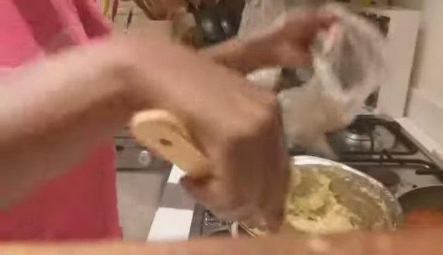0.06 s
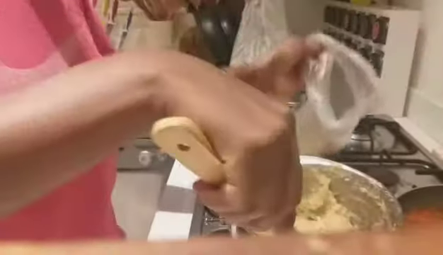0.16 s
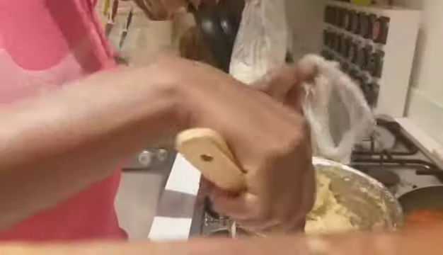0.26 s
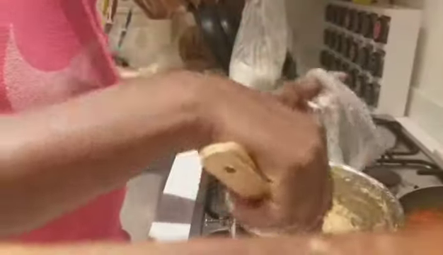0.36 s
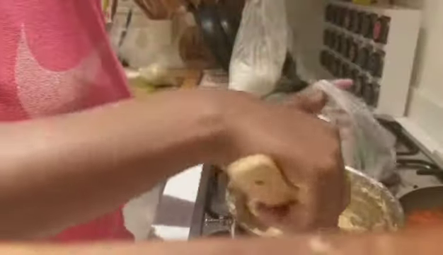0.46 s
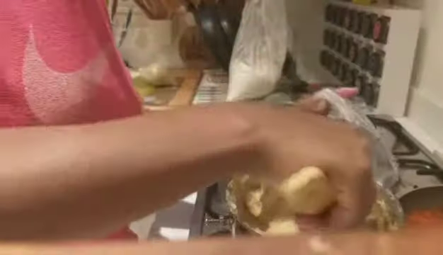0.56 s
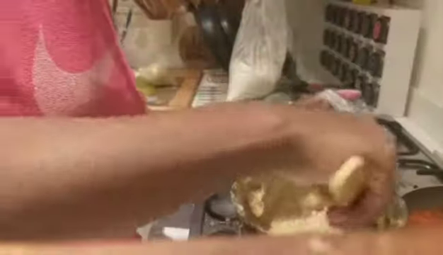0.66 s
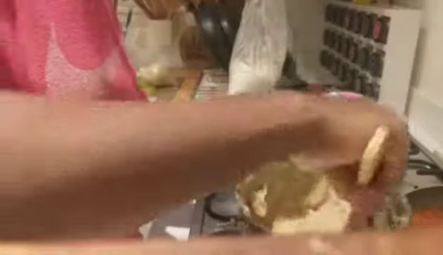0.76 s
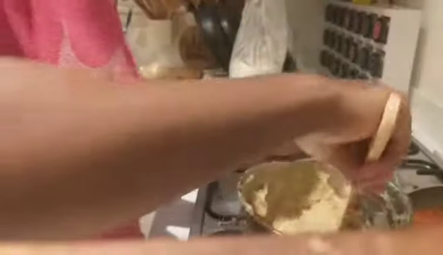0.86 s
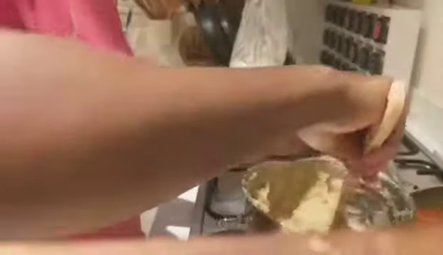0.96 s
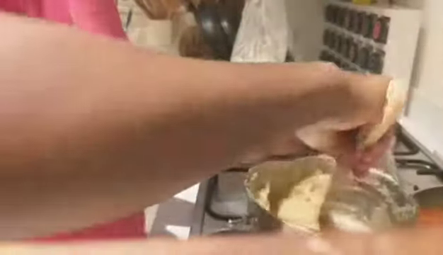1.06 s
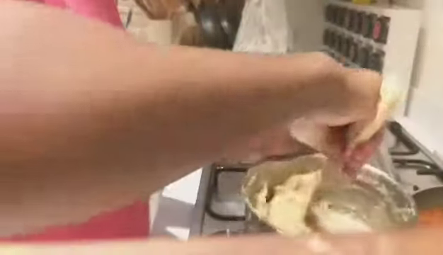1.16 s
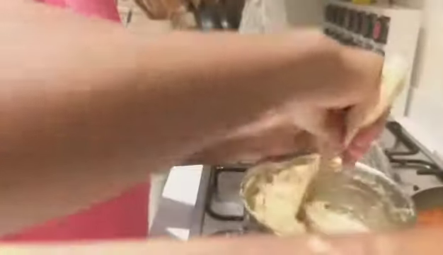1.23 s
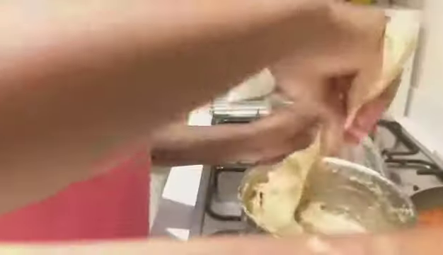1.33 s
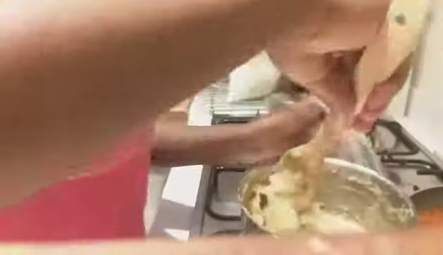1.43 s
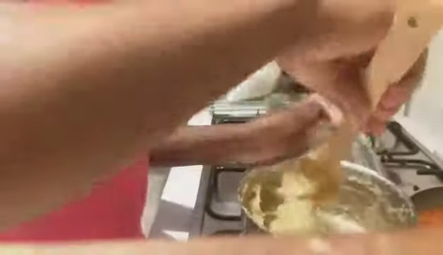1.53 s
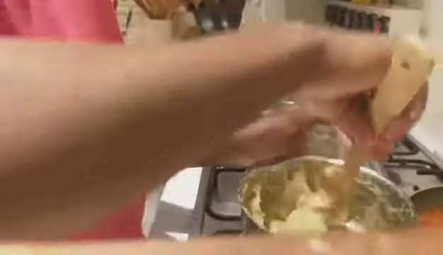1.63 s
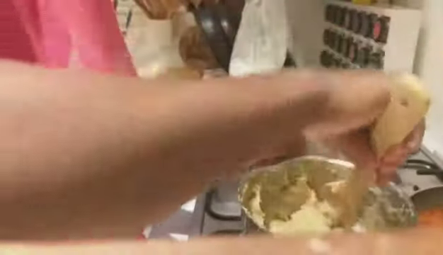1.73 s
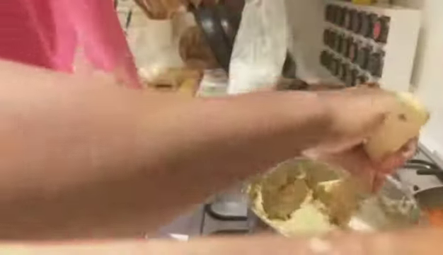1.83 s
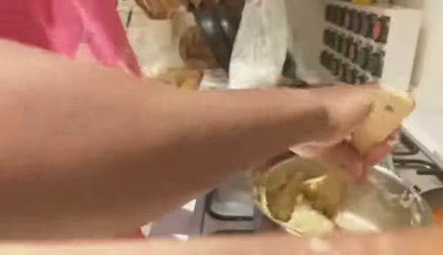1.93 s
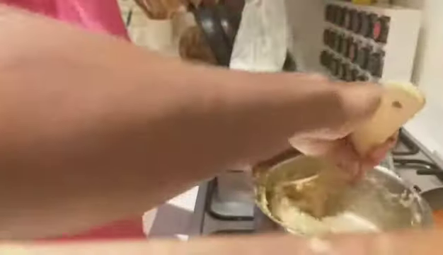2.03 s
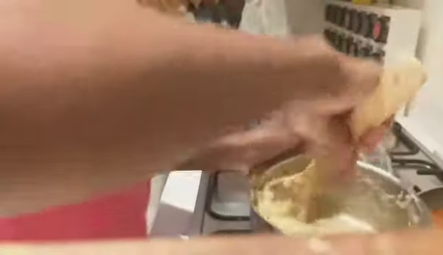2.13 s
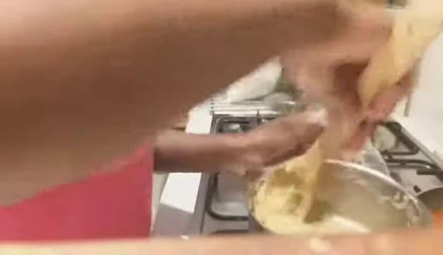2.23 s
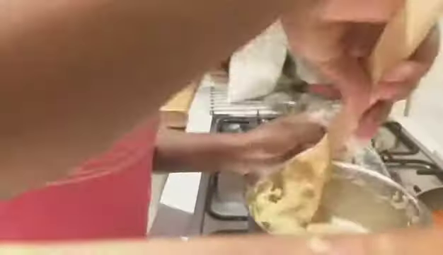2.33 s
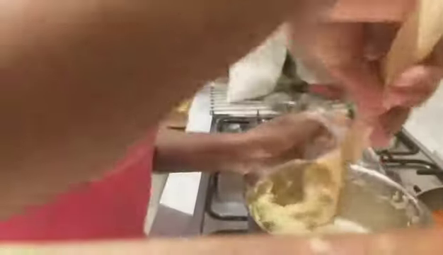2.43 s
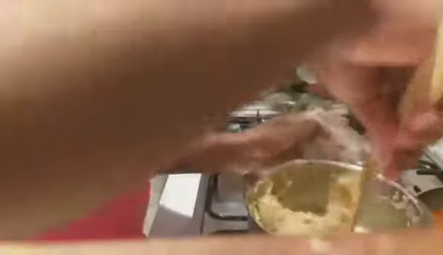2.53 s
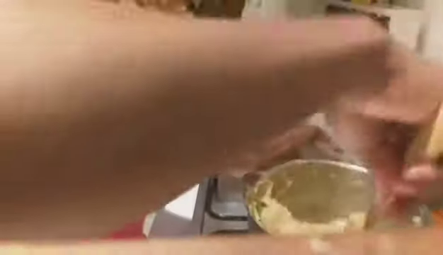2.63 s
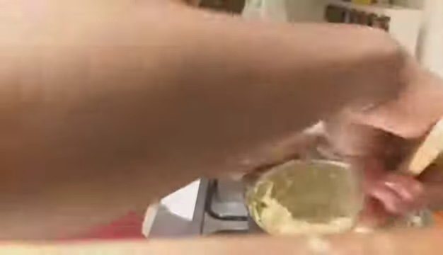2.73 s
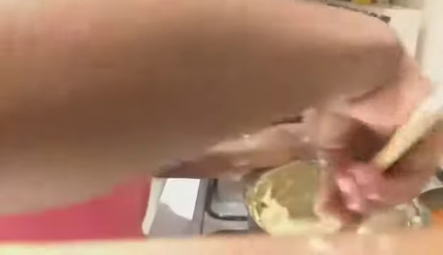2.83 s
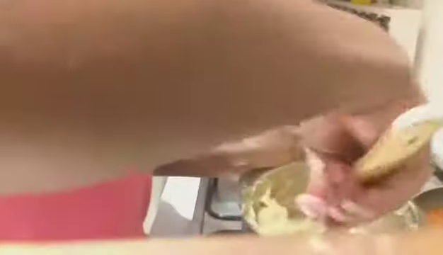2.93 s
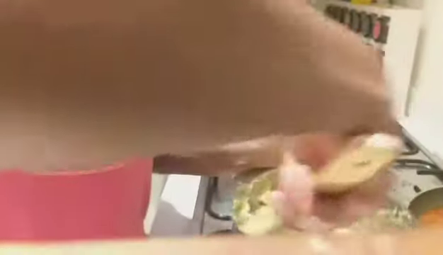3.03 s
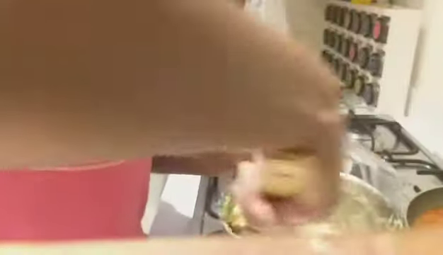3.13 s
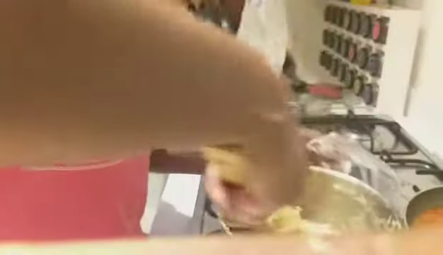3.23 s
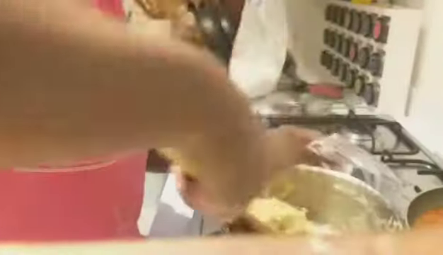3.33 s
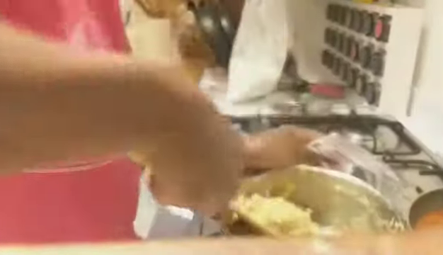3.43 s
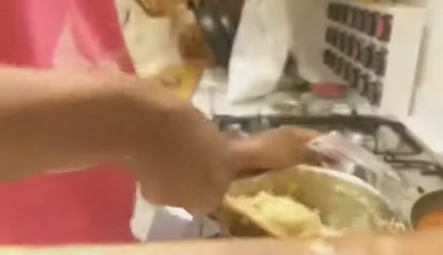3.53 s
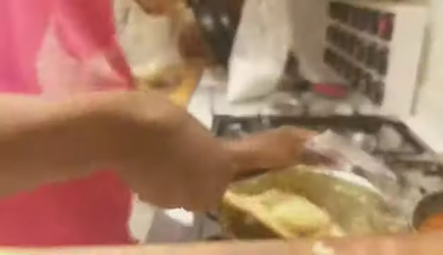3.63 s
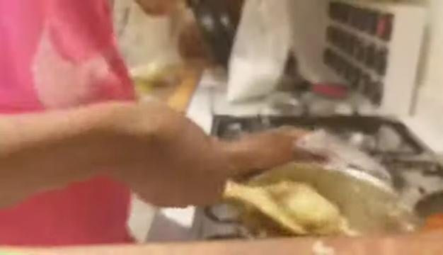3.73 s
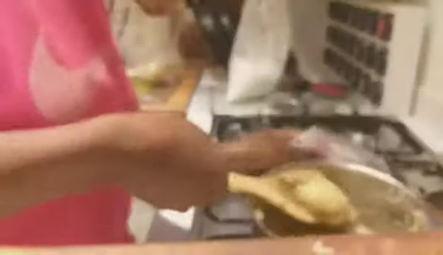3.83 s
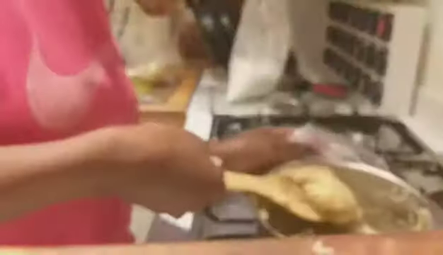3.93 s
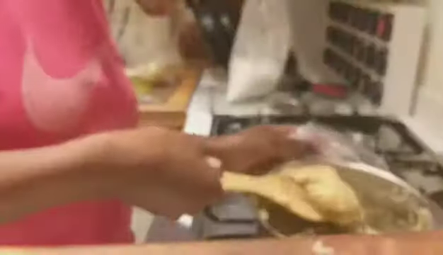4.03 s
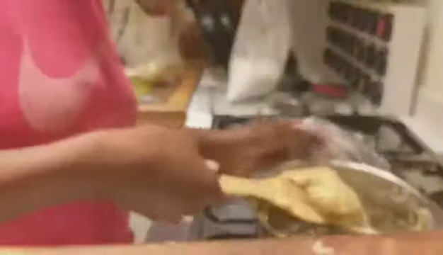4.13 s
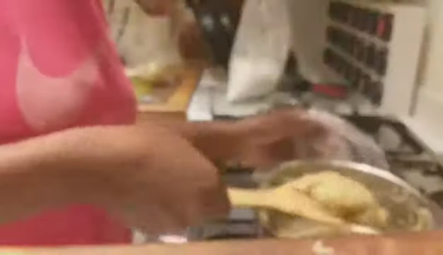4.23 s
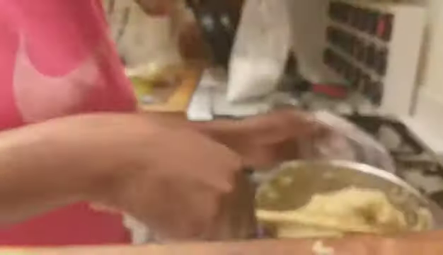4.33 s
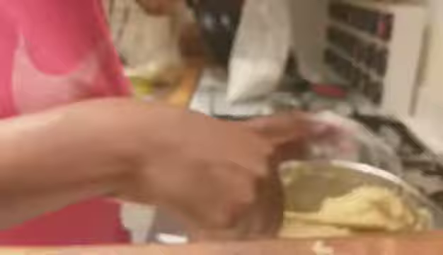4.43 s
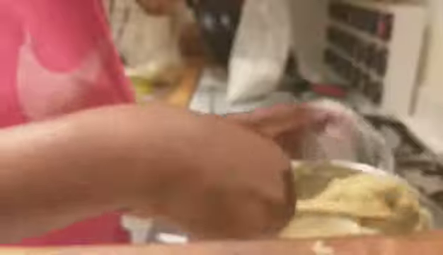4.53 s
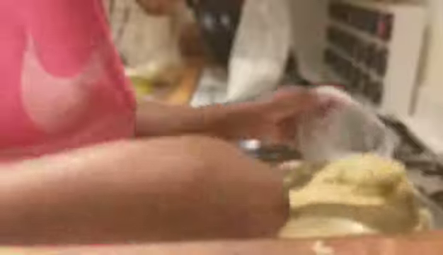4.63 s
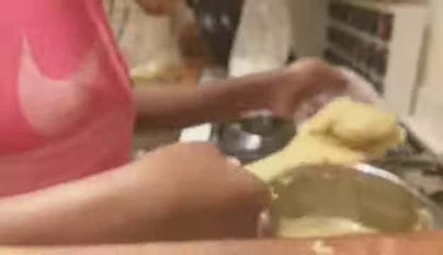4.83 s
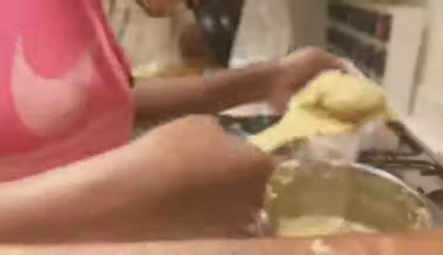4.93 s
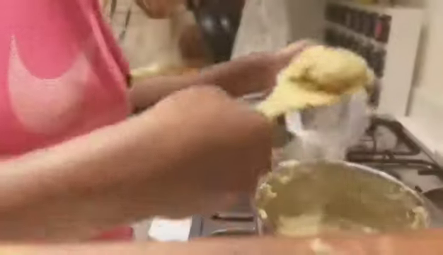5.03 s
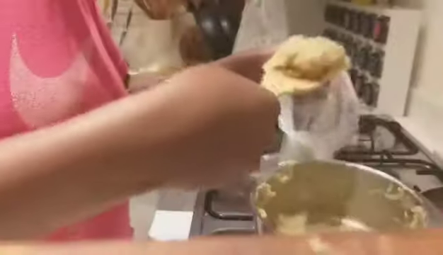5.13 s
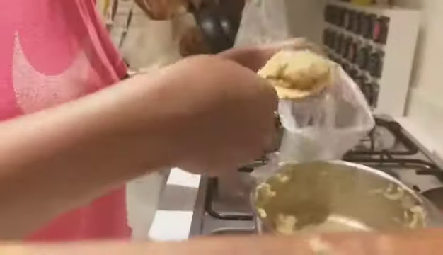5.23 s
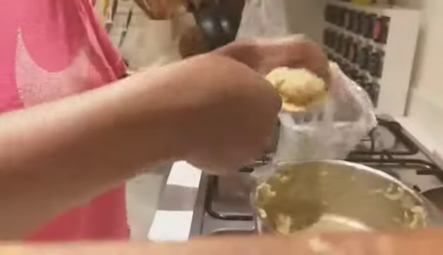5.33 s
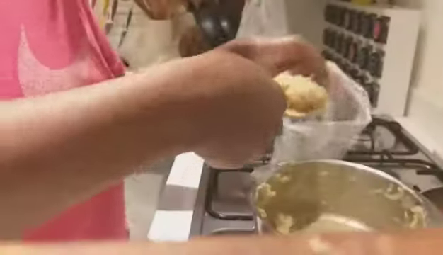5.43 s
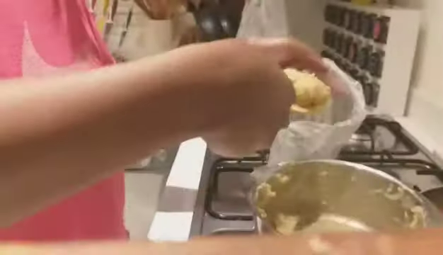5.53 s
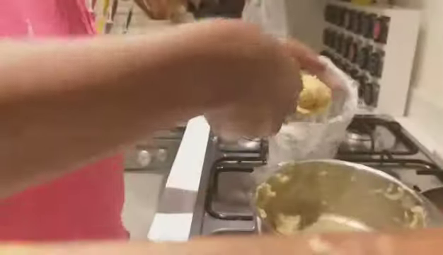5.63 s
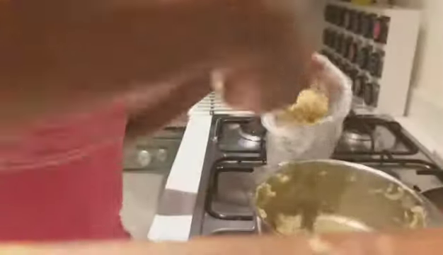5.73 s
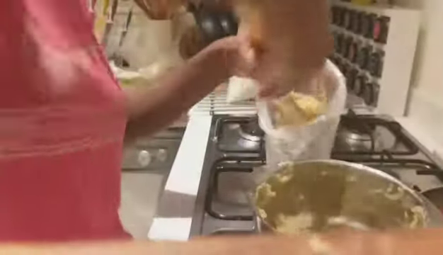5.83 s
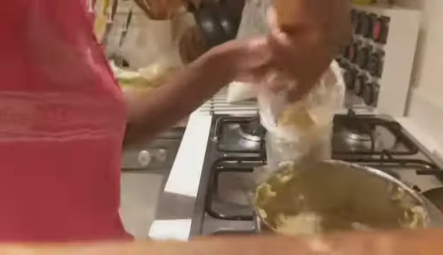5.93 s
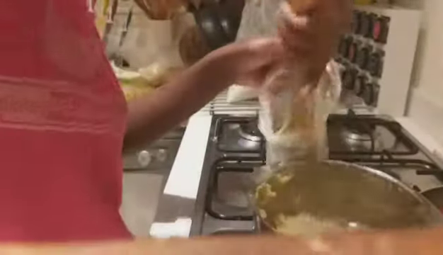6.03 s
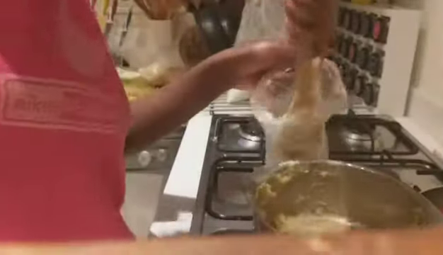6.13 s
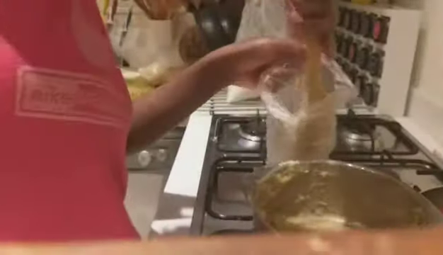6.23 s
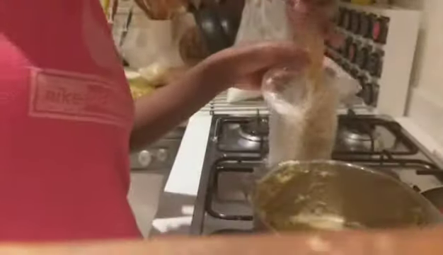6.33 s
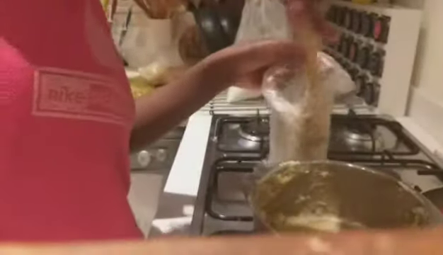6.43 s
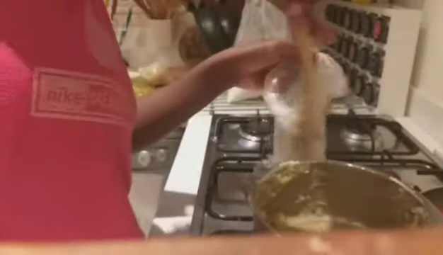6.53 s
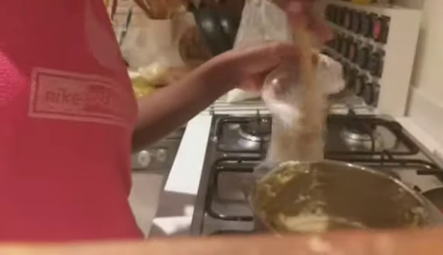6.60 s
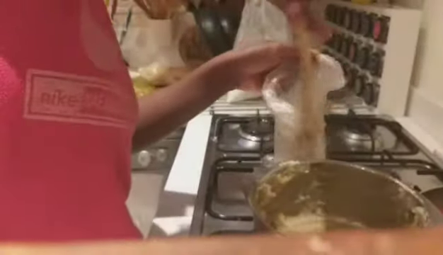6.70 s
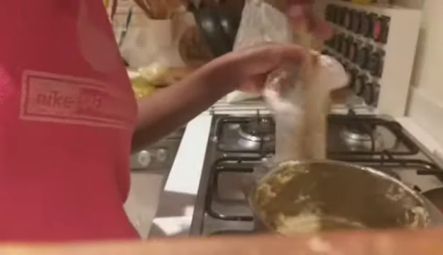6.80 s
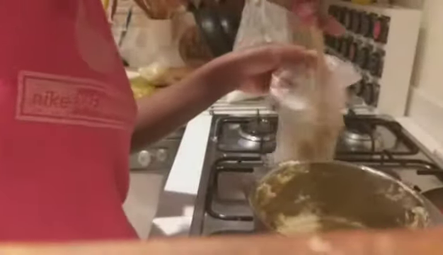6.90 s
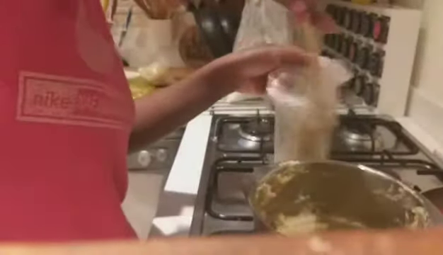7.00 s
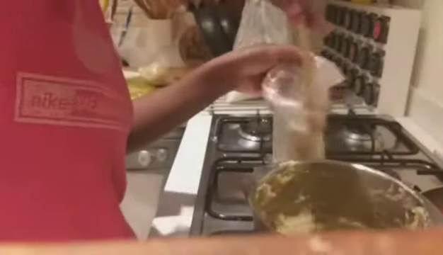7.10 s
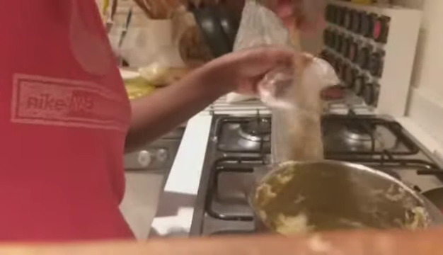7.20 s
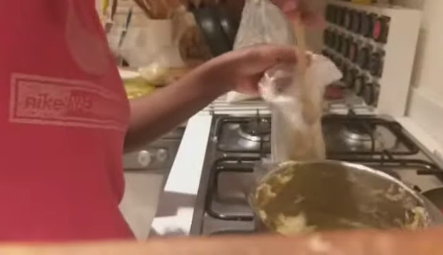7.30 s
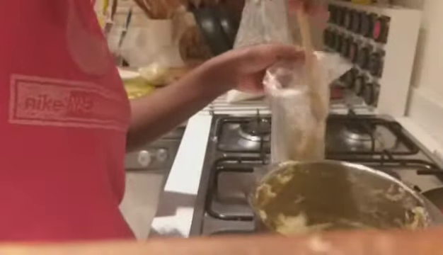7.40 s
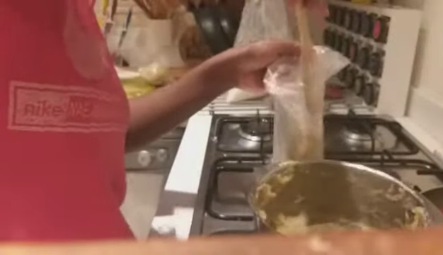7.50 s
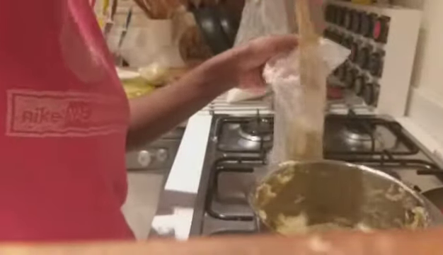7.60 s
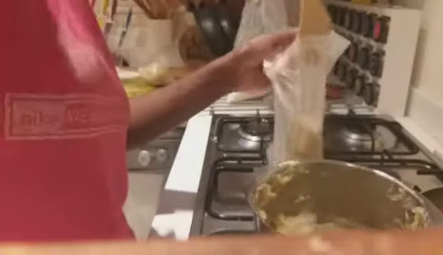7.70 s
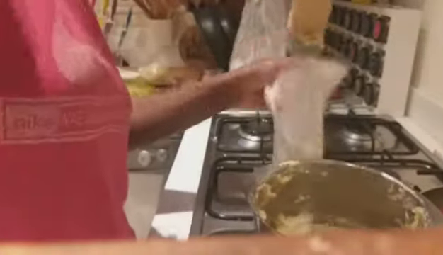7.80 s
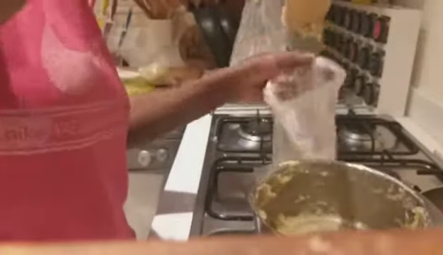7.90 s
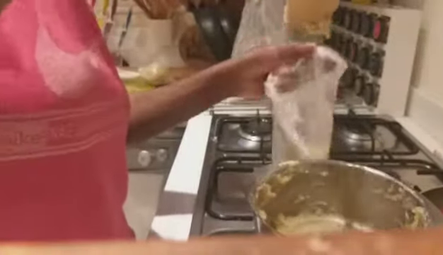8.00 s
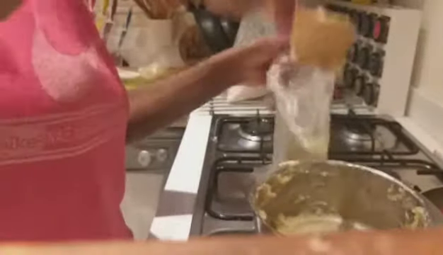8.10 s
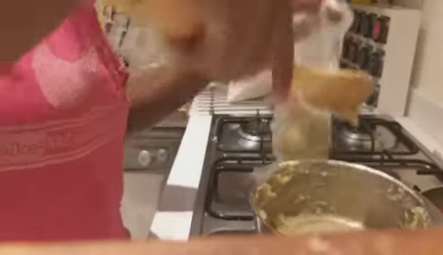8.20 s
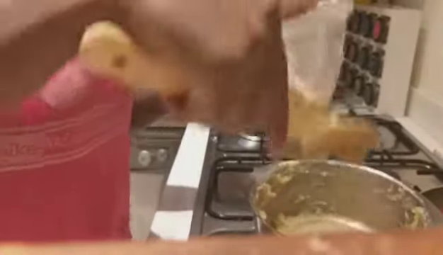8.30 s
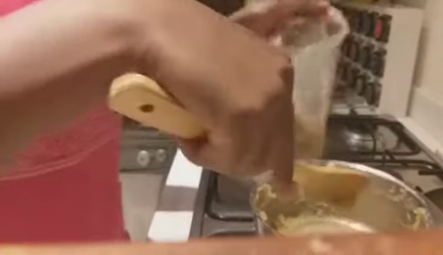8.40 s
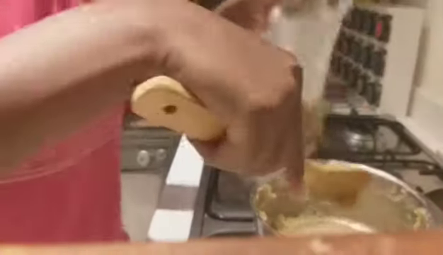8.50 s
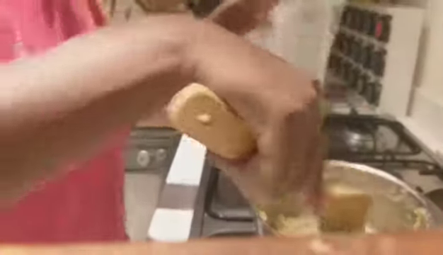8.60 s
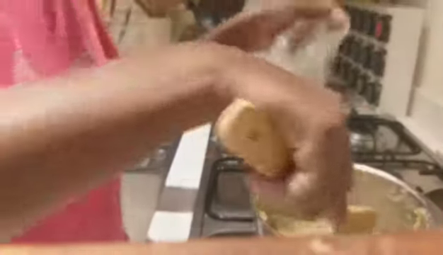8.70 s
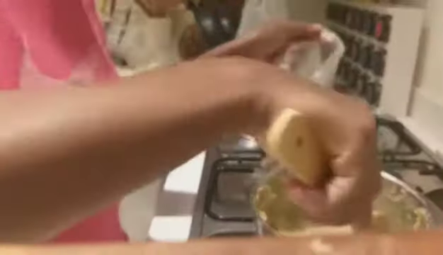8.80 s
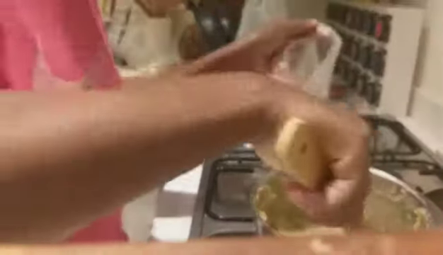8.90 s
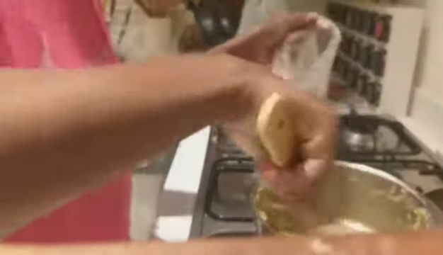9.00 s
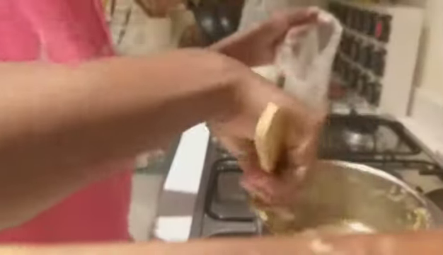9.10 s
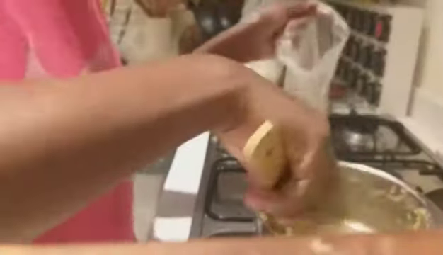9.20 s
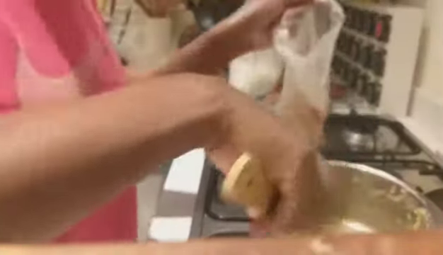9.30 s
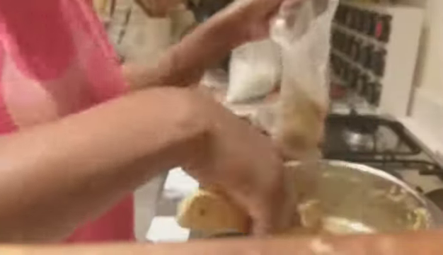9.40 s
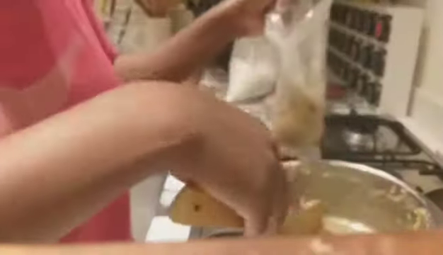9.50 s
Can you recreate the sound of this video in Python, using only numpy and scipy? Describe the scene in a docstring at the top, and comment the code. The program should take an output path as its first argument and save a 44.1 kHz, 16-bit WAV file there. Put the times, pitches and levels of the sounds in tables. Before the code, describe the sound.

A wooden spoon knocks, scrapes and squeals against a steel pot, then a thin plastic bag rustles as soft dough slaps inside.

```python
"""A small kitchen, microphone at arm's length from a steel pot of soft dough on a gas hob.
First a thin plastic bag rustles in one hand. A wooden spoon scoops and knocks the pot, which rings
and rocks on its grate. Around three seconds in, the spoon rubs along the wall and squeals twice.
Then the bag rustles most, as the spoon is wiped off inside it and dough slaps the film.
A last few knocks on the pot close the scene."""
import sys
import numpy as np
from scipy import signal
from scipy.fft import rfft, irfft
from scipy.io import wavfile

SR = 44100
rng = np.random.default_rng(int(sys.argv[2]) if len(sys.argv) > 2 else 0)


def generate_wav(sig):
    """Save sig (samples, or channels by samples) to the path in sys.argv[1] as 16-bit PCM at SR."""
    pcm = np.round(np.clip(np.atleast_2d(sig).T, -1, 1) * 32767).astype(np.int16)
    wavfile.write(sys.argv[1], SR, pcm)


N = 421155
TIME = np.arange(N) / SR

# spoon on pot: t/s, force/dB, hardness/dB (low where dough cushions), free ringing/dB, share to hob/dB
KNOCKS = [(0.756, -35, -2, -24, -7), (1.022, -50.5, -14, -15, -6), (1.058, -27.5, -7.5, -16, -8.5),
          (1.198, -20, 9.5, -7.5, -12.5), (1.236, -30.5, -1.5, 7, -19), (1.745, -53.5, 13, -15, -4),
          (1.892, -34.5, 7.5, -12, -1), (1.912, -29.5, -2.5, -25, -15), (1.937, -29, 3.5, -10, -11.5),
          (2.679, -51, -24.5, -9, -3.5), (2.874, -50, 15.5, -20, -9.5), (7.664, -52.5, -28, -9, -6),
          (8.174, -52, -36, -13, -6.5), (8.809, -41, -17, 3, -4.5), (9.443, -47.5, 4.5, -10.5, 1),
          (9.448, -36.5, 6, 2, -17)]
# modes at the stove: f/Hz, level/dB, t60/s
WALL_MODES = [(3252, -17, .25), (3560, -14, .2), (4290, -9, .08), (4350, -5, .1), (4403, -3, .16),
              (4436, -3, .34), (4497, 0, .26), (4528, -2, .14)]   # long ring of the pot wall
UPPER_WALL_MODES = [(5604, -7, .28), (5700, -3, .22), (5793, -1, .16), (5885, -2, .13), (6290, -7, .24),
                    (6575, 0, .28), (6660, -3, .18), (6710, -4, .14), (7900, -9, .28), (10920, -15, .22)]   # brought out by hard blows
CLANG_MODES = [(4470, 0, .03)]   # the wall while the spoon still touches it
UPPER_CLANG_MODES = [(4480, 2, .03), (5800, 0, .022), (6620, 0, .024), (7900, -8, .025)]   # the same under a hard blow
BASE_MODES = [(860, -5, .025), (1130, -2, .025), (1400, -1, .024), (1780, -7, .02)]   # pot base, damped by dough
SPOON_MODES = [(590, 2, 0.019), (677, 0, 0.021), (734, -5.5, 0.025)]
HOB_MODES = [(105, -14, .12), (152, 0, .18), (179, 0, .18), (208, -4, .12), (270, -9, .08), (345, -7, .1)]   # hollow top of the hob
# spectra of the contact noises: f/Hz, level/dB
THUD_SPECTRUM = [(50, -33.5), (110, -5.5), (170, -1.5), (260, 4.5), (400, -13.5), (700, -14)]
CLACK_SPECTRUM = [(200, -6.5), (420, -6.5), (600, -2), (900, -6), (1350, -13), (2000, -13), (3200, -16.5),
                  (8000, -24.5)]
CRACK_SPECTRUM = [(1500, -17.5), (3000, -6), (4500, -3.5), (6500, 1), (8000, -2.5), (10000, -18),
                  (12000, -10), (16000, -19.5)]

def knocks(hardening=0.59):
    """Each knock cracks, rings the steel, clacks in the wood and thumps the hob through the grate."""
    times, force_db, hardness_db, free_db, hob_db = np.transpose(KNOCKS)
    thud_db = force_db + hob_db
    tock_db = force_db - 6.5 - 0.21 * hardness_db   # softer contact draws more from the base
    crack_db = force_db + hardness_db
    steel_db = crack_db + free_db
    touch = blows(times, steel_db)
    hard = blows(times, steel_db + hardening * (steel_db - steel_db.max()))   # harder is brighter
    steel = from_db(16) * ring(touch, WALL_MODES) + from_db(25.5) * ring(touch, CLANG_MODES)
    bright = from_db(20) * ring(hard, UPPER_WALL_MODES) + from_db(23) * ring(hard, UPPER_CLANG_MODES)
    crack = from_db(4) * colour(bursts(times, crack_db, t60=0.035, rise_s=0.0011), CRACK_SPECTRUM)
    chatter = bursts(times, force_db, t60=0.11, rise_s=0.0037)
    clack = from_db(-0.5) * (colour(chatter, CLACK_SPECTRUM) + ring(chatter, SPOON_MODES))
    tock = ring(bursts(times, tock_db, t60=0.16, rise_s=0.00072), BASE_MODES)
    thud = colour(bursts(times, thud_db, t60=0.22, rise_s=0.0088), THUD_SPECTRUM)
    hob = from_db(34) * ring(blows(times, thud_db), HOB_MODES)
    return steel + bright + crack + clack + tock + thud + hob


# stick-slip curves on the pot wall: t/s, f/Hz, level/dB
HIGH_SQUEAL = [(2.89, 2110, -56.5), (2.906, 2133, -46.5), (2.948, 2110, -18.5), (2.982, 2103, -15),
               (3.032, 2098, -25), (3.048, 2110, -19.5), (3.096, 2090, -15.5), (3.13, 2105, -23),
               (3.146, 2101, -19.5), (3.21, 2099, -30)]
LOW_SQUEAL = [(3.594, 1773, -37), (3.648, 1757, -15), (3.706, 1775, -23), (3.748, 1751, -9.5),
              (3.762, 1826, -14.5), (3.792, 1827, -20), (3.802, 1845, -19), (3.824, 1745, -29.5),
              (3.832, 1796, -24), (3.946, 1829, -15), (3.975, 1849, -33)]
SQUEAK = [(.62, 1700, -70), (.655, 1770, -40), (.685, 1743, -52.5)]
# timbre of those three in turn: octave/dB, higher overtones/dB, rasp/dB
SQUEAL_TIMBRES = [(-4, -23.5, -44), (-6, -14, -37), (-19.5, -25, -60.5)]
# partials above the octave: multiple, level/dB
OVERTONES = [(3, 3), (4, -2.5), (5, -8.5), (6, -16), (7, -15.5), (8, -23)]
# friction noise in a squeal: f/Hz, level/dB
RASP_SPECTRUM = [(500, -12), (900, -10), (1800, 1), (2700, -3.5), (4300, -2.5), (6000, -1), (8000, -3),
                 (10000, -18.5), (12500, -12.5), (15500, -24)]
FIRM_DB = -18.5   # curve level that stands for a firmly pressed spoon

def squeals(flutter_db=2.0, rasp_peak_share=0.6):
    """Wood sticks and slips on steel; pressure adds overtones, and rasp swells in mid-stroke."""
    tone, rasp = np.zeros(N), np.zeros(N)
    wobble = .0045 * drift(70) + .010 * drift(600)
    grip = from_db(flutter_db * drift(45))
    flickers = [(k, from_db(db + 2.5 * drift(60))) for k, db in OVERTONES]
    for curve, (octave_db, upper_db, rasp_db) in zip((HIGH_SQUEAL, LOW_SQUEAL, SQUEAK), SQUEAL_TIMBRES):
        gate, pitch, level_db = gate_and_curves(curve)
        on = gate > 0
        pressure_db = level_db[on] - FIRM_DB
        phase = 2 * np.pi * np.cumsum(pitch[on] * (1 + wobble[on])) / SR
        fundamental = from_db(-4 + 0.8 * pressure_db) * grip[on] * np.sin(phase)
        octave = from_db(octave_db + 1.65 * pressure_db) * np.sin(2 * phase)
        upper = sum(flicker[on] * np.sin(k * phase) for k, flicker in flickers)
        overtones = from_db(upper_db + pressure_db) * upper
        tone[on] += gate[on] * from_db(FIRM_DB + 0.5) * (fundamental + octave + overtones)
        progress = np.linspace(0, 1, on.sum())
        swell_db = -30.5 * (progress / rasp_peak_share - 1) ** 2
        rasp[on] += gate[on] * from_db(rasp_db + 0.77 * pressure_db + swell_db)
    slips = rasp * grains(per_s=6000, spread_db=1.8) * grip
    return tone + from_db(6) * colour(slips, RASP_SPECTRUM) + from_db(2) * ring(slips, WALL_MODES)


def judder(jitter=0.058, fade_db_per_s=47.5):
    """Every third slip of the high squeal is stronger: a rough low note, fading as the spoon speeds up."""
    gate, pitch, level_db = gate_and_curves(HIGH_SQUEAL)
    phase = 2 * np.pi * np.cumsum(pitch / 3 * (1 + jitter * drift(150))) / SR
    broken = from_db(3 * drift(80))
    age_s = np.clip(TIME - HIGH_SQUEAL[0][0], 0, 1)
    strength = from_db(-37 + 0.42 * (level_db - FIRM_DB) - fade_db_per_s * age_s)
    note = np.sin(phase) + 0.551 * np.sin(2 * phase) + 0.17 * np.sin(4 * phase)
    return gate * broken * strength * note


# wall modes bowed by the spoon: f/Hz, level/dB, t60/s
BOWED_MODES = [(790, -9, 0.086), (1029, -6, 0.17), (4355, 7.5, 0.083), (5700, -4.5, 0.039)]

def bowed_wall():
    """Late in the low squeal, friction keeps a few modes of the wall ringing."""
    push = from_db(-33.5) * gesture(start_s=3.72, length_s=.23, attack_s=0.21, release_s=.1)
    return ring(push * rng.standard_normal(N), BOWED_MODES)


# spoon strokes, along the pot wall and last inside the bag: t/s, length/s, rub/dB, scrape/dB
STROKES = [(0.634, 0.16, -62.5, -52.5), (1.735, 0.16, -46.5, -53), (2.102, 0.16, -59.5, -48.5),
           (3.709, 0.22, -41.5, -41.5), (6.62, 0.546, -65.5, -61.5)]
# dull rub and grainy scrape: f/Hz, level/dB
RUB_SPECTRUM = [(100, -7.5), (180, 6.5), (400, -2.5), (750, 9), (1100, -1), (2000, -15)]
SCRAPE_SPECTRUM = [(700, -25.5), (1300, -2), (1750, 3), (2500, -19), (3600, -7.5), (6000, -11.5),
                   (10000, -19.5)]

def strokes():
    """The spoon rubs and scrapes: scoops along the pot wall, then a long, soft wipe inside the bag."""
    rub, scrape = np.zeros(N), np.zeros(N)
    for start, length, rub_db, scrape_db in STROKES:
        push = gesture(start, length, attack_s=0.041, release_s=0.051)
        rub += push * from_db(rub_db)
        scrape += push * from_db(scrape_db)
    drags = rub * grains(per_s=2000, spread_db=2)
    slips = scrape * grains(per_s=3000, spread_db=2)
    scraping = from_db(-2) * colour(slips, SCRAPE_SPECTRUM) + from_db(-13) * ring(slips, WALL_MODES)
    return from_db(-3.5) * colour(drags, RUB_SPECTRUM) + scraping


# the bag in the other hand, at arm's length: t/s, length/s, level/dB
BAG_MOVES = [(0, 0.35, -58.5), (0.022, 0.025, -51), (0.244, 0.094, -50.5), (0.353, 0.27, -53.5),
             (0.552, 0.086, -49), (0.655, 0.071, -59), (1.61, 0.11, -64.5), (1.73, 0.57, -58),
             (2.373, 0.63, -69.5), (2.717, 0.2, -57), (4.072, 0.21, -63.5), (4.342, 0.023, -52),
             (4.499, 0.34, -48.5), (4.857, 0.32, -50), (5.1, 0.2, -49.5), (5.55, 0.406, -54.5),
             (5.341, 0.11, -57.5), (5.443, 0.09, -51), (5.939, 0.049, -41), (6.045, 0.29, -46),
             (6.388, 0.16, -53.5), (6.535, 0.823, -45.5), (6.625, 0.025, -45), (6.886, 0.19, -43),
             (7.356, 1, -56.5), (7.575, .12, -50.5), (7.815, 0.12, -43.5), (8.108, 0.055, -47),
             (8.291, 0.055, -49.5), (8.383, .055, -38), (8.494, 0.35, -51), (8.87, 0.16, -58.5)]
# single snaps of the film: t/s, level/dB
SNAPS = [(.052, -59), (4.378, -60.5), (4.714, -52), (5.501, -64.5), (5.993, -30.5), (6.646, -41),
         (7.585, -59), (7.684, -54), (8.283, -56.5), (9.059, -62.5)]
# fine crinkles and larger folds: f/Hz, level/dB
FILM_SPECTRUM = [(1800, -27), (2800, -16.5), (4300, -3.5), (7000, 3), (8600, 1), (10000, -7.5),
                 (11200, -3.5), (13000, 1.5), (15500, 0)]
FOLD_SPECTRUM = [(200, -20), (600, -7.5), (900, -7.5), (1600, -2), (2400, -3), (3600, 6), (5000, -1.5),
                 (8000, -27)]

def bag(flicker_db=2.0, brisk_db=-45, fold_growth=1.74):
    """Thin film crinkles in dense clumps; brisk movements buckle larger, lower folds, and a few snap."""
    moves = (from_db(db) * gesture(start, length, attack_s=0.044, release_s=0.14)
             for start, length, db in BAG_MOVES)
    motion = np.sqrt(sum(move ** 2 for move in moves))
    folds = from_db(-54.5) * (motion / from_db(brisk_db)) ** fold_growth
    clumps = from_db(flicker_db * drift(25))
    hiss = colour(motion * clumps * grains(per_s=14000, spread_db=2.2), FILM_SPECTRUM)
    crumple = from_db(1) * colour(folds * clumps * grains(per_s=7000, spread_db=1.8), FOLD_SPECTRUM)
    crackle = from_db(-13) * colour(motion * grains(per_s=160, spread_db=1.6), CRACK_SPECTRUM)
    snap = bursts(*np.transpose(SNAPS), t60=0.031)
    snaps = from_db(8.5) * colour(snap, CRACK_SPECTRUM) + from_db(-13) * colour(snap, FILM_SPECTRUM)
    return hiss + crumple + crackle + snaps


# dough landing in the bag: t/s, level/dB
SLAPS = [(5.991, -41.5), (7.873, -52), (8.424, -49)]

def dough_slaps():
    """Dough slaps against the bag with a dull, woody knock."""
    slap = bursts(*np.transpose(SLAPS), t60=0.26)
    body = from_db(-2.5) * ring(slap, SPOON_MODES) + from_db(-5) * ring(slap, BASE_MODES)
    return from_db(-21) * colour(slap, CLACK_SPECTRUM) + body


# decay of the small kitchen: f/Hz, t60/s
ROOM_T60 = [(100, 0.44), (400, 0.26), (1500, 0.4), (4500, 0.38), (9000, 0.36), (16000, 0.31)]

def kitchen(x, wet_db, first_echo_s=0.0068):
    """Direct sound reaches the microphone, then a dense tail from hard walls, dying band by band."""
    t, tail = TIME[:int(.7 * SR)], 0
    edges = np.geomspace(60, 18000, 10)
    hz = np.arange(len(t) // 2 + 1) * SR / len(t)
    echoes = rfft(rng.standard_normal(len(t)))
    for low, high in zip(edges, edges[1:]):
        band = irfft(echoes * ((hz >= low) & (hz < high)), len(t))
        tail = tail + band * from_db(-60 * t / at_hz(ROOM_T60, np.sqrt(low * high)))
    tail = tail * np.clip(t / first_echo_s - 1, 0, 1)
    wet = from_db(wet_db)
    return (x + wet * signal.oaconvolve(x, tail / np.linalg.norm(tail))[:N]) / np.hypot(1, wet)


# the quiet kitchen: f/Hz, level/dB
ROOM_TONE_SPECTRUM = [(25, -14.5), (50, -13), (105, 1.5), (170, -0.5), (280, -10), (500, -12.5), (900, -17),
                      (1500, -21), (3000, -28.5), (8000, -25), (15500, -26.5)]

def room_tone():
    """Faint, steady, low noise behind everything."""
    return from_db(-69) * colour(rng.standard_normal(N), ROOM_TONE_SPECTRUM)


def from_db(db):
    """Decibels to gain."""
    return np.exp(np.asarray(db) * (np.log(10) / 20))


def unit_power(x):
    """Scale to an RMS of 1."""
    return x / np.sqrt(np.mean(x ** 2) + 1e-20)


def at_hz(points, hz):
    """Read a table on a log-frequency axis."""
    f, value = np.transpose(points)
    return np.interp(np.log(hz + 1e-9), np.log(f), value)


def gate_and_curves(rows):
    """A gate that is open while the gesture lasts, then each column as a curve."""
    times, *columns = np.transpose(rows)
    gate = np.clip(np.minimum(TIME - times[0], times[-1] - TIME) / .012 + 1, 0, 1)
    return [gate] + [np.interp(TIME, times, column) for column in columns]


def gesture(start_s, length_s, attack_s, release_s):
    """Attack, hold and release of one movement of the hand."""
    attack = np.clip((TIME - start_s) / attack_s, 0, 1)
    return attack * np.clip(1 - (TIME - start_s - length_s) / release_s, 0, 1) ** 2


def drift(rate_hz):
    """Smooth random wander, unit power."""
    points = rng.standard_normal(N // 8)
    return unit_power(np.interp(TIME * rate_hz * 2, np.arange(len(points)), points))


def grains(per_s, spread_db):
    """Tiny random slips of uneven size, unit power."""
    sizes = from_db(spread_db * np.minimum(rng.exponential(1, N), 4))
    return unit_power(sizes * rng.standard_normal(N) * (rng.random(N) < per_s / SR))


def blows(times, levels_db):
    """One sharp push per blow."""
    force = np.zeros(N)
    force[np.round(np.asarray(times) * SR).astype(int)] = from_db(levels_db)
    return force


def bursts(times, levels_db, t60, rise_s=0.00041):
    """Contact chatter: noise that swells at each blow and dies away."""
    swell = np.exp(-1 / (rise_s * SR))
    level = signal.lfilter([1], [1, -from_db(-60 / (t60 * SR))], blows(times, levels_db) + 1e-18)
    return signal.lfilter([1 - swell], [1, -swell], level) * rng.standard_normal(N)


def ring(force, modes):
    """Decaying sines, set going by the force."""
    t = TIME[:SR // 2]
    pulse = sum((-1) ** k * from_db(db - 60 * t / t60) * np.sin(2 * np.pi * hz * t)
                for k, (hz, db, t60) in enumerate(modes))
    return signal.oaconvolve(force, pulse / np.linalg.norm(pulse))[:N]


def colour(x, spectrum, size=4096):
    """Minimum-phase filter with the given spectrum, falling off beyond its ends; unit power gain."""
    hz = np.maximum(np.arange(size // 2 + 1) * SR / size, 5)
    octaves_outside = np.abs(np.log2(hz / np.clip(hz, spectrum[0][0], spectrum[-1][0])))
    cepstrum = irfft(np.log(from_db(at_hz(spectrum, hz) - 23.5 * octaves_outside)))
    pulse = irfft(np.exp(rfft(2 * cepstrum[:size // 2], size)))
    return signal.oaconvolve(x, pulse / np.linalg.norm(pulse))[:len(x)]


def scene(rumble_cut_hz=68):
    """Pot and bag at arm's length, almost mono; only faint treble of pot and spoon spreads to the sides."""
    air = room_tone()
    spoon = knocks() + strokes()
    squealing = squeals() + judder() + bowed_wall()
    filling = bag() + dough_slaps()
    sound = kitchen(spoon, wet_db=-3) + kitchen(squealing, wet_db=-6.5) + kitchen(filling, wet_db=-7)
    mid = air + signal.sosfilt(signal.butter(3, rumble_cut_hz, "high", fs=SR, output="sos"), sound)
    treble = signal.sosfilt(signal.butter(4, 1300, "high", fs=SR, output="sos"), spoon + squealing)
    side = from_db(-47) * kitchen(treble, wet_db=7)
    return np.array([mid + side, mid - side])


# a peak and a dip in the left microphone: f/Hz, width/Hz, level/dB
LEFT_MIC = [(1881, 72, 6.5), (10640, 660, -3.5)]
CUTOFF_HZ = 15650

def record(dry):
    """The left microphone colours the sound, peaks are rounded, the top is cut."""
    left, right = dry
    for hz, width_hz, db in LEFT_MIC:
        left = left + (from_db(db) - 1) * signal.lfilter(*signal.iirpeak(hz, hz / width_hz, fs=SR), left)
    rounded = 2 * np.tanh(np.array([left, right]) / 2)
    return signal.sosfilt(signal.ellip(12, .1, 80, CUTOFF_HZ, fs=SR, output="sos"), rounded)


dry = scene()
out = record(dry)
generate_wav(out)
```